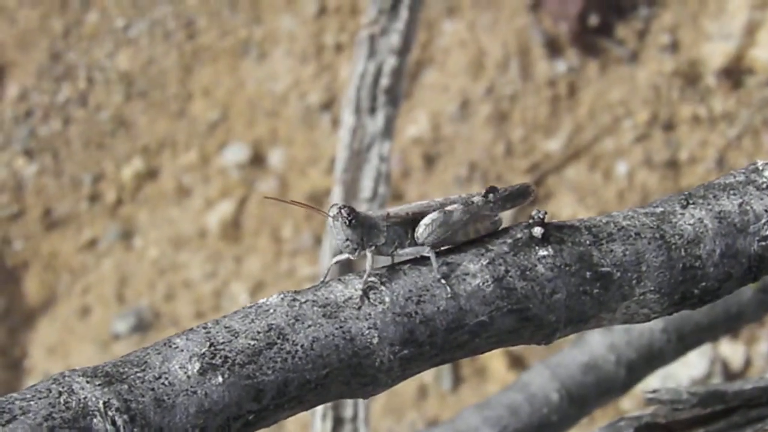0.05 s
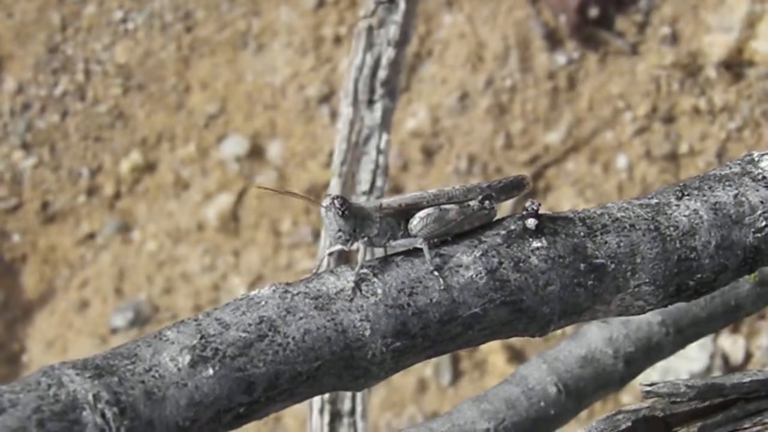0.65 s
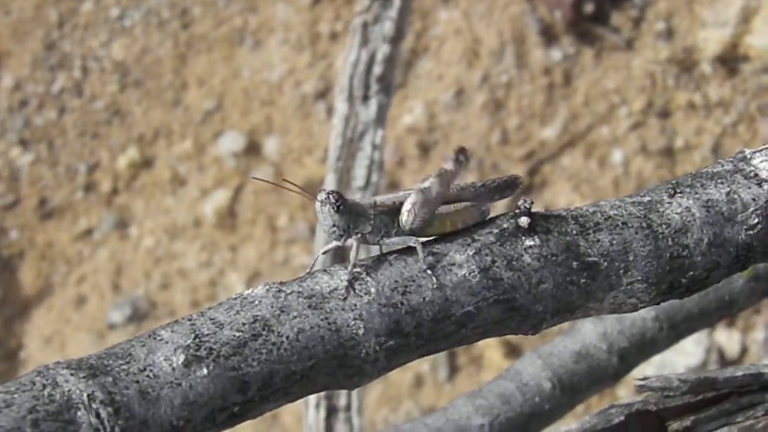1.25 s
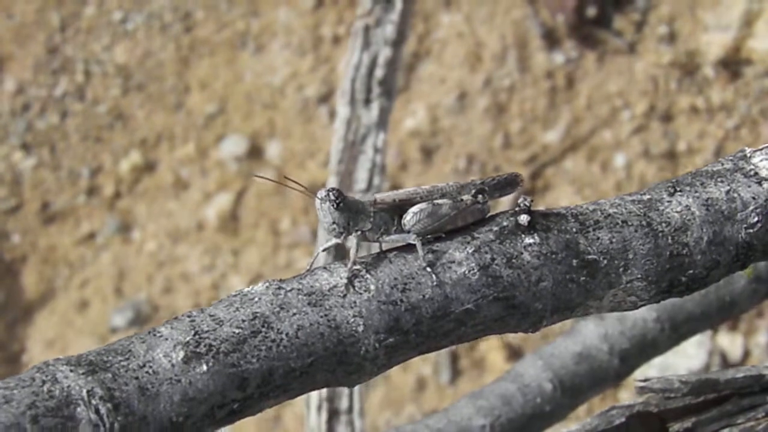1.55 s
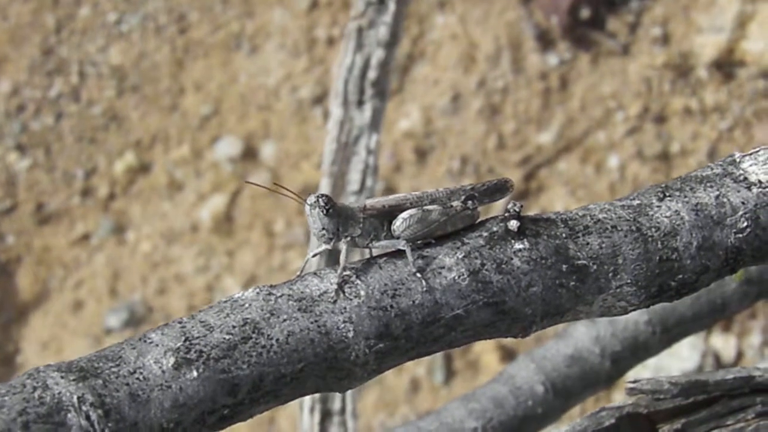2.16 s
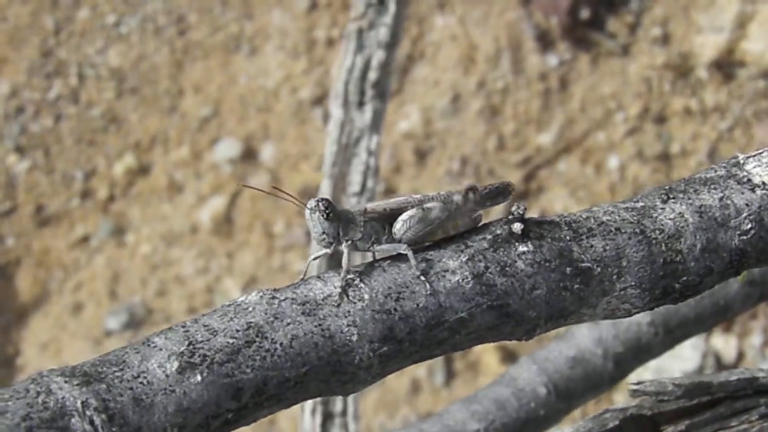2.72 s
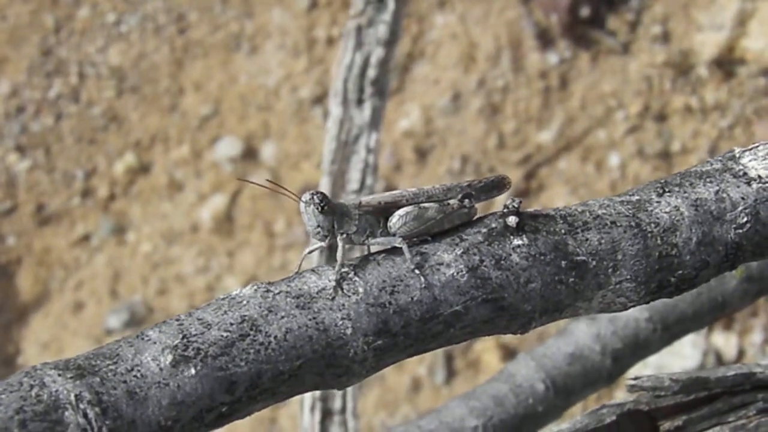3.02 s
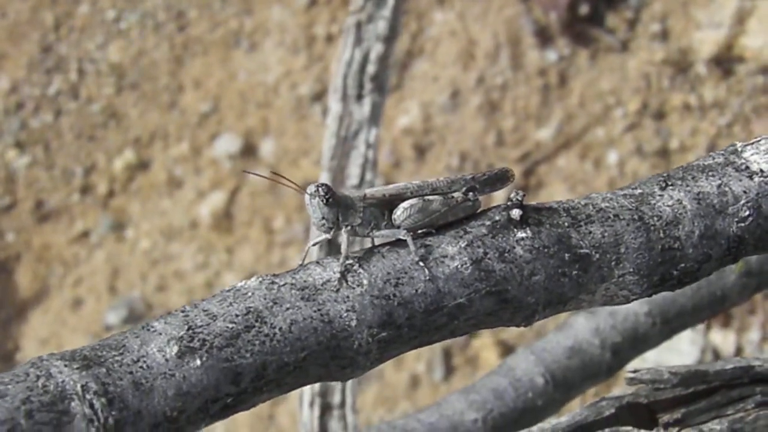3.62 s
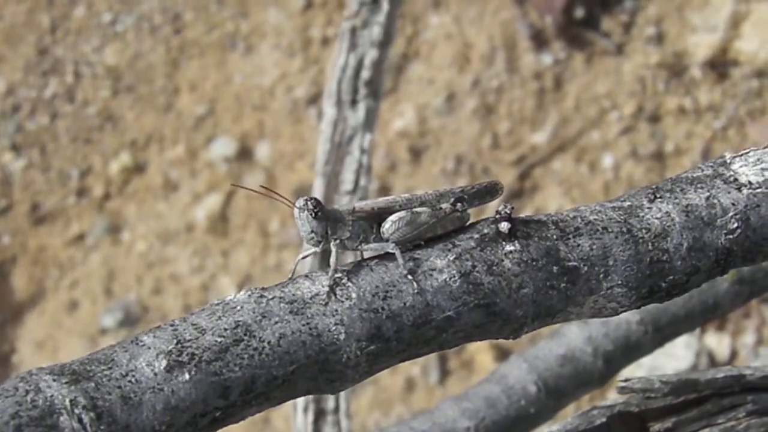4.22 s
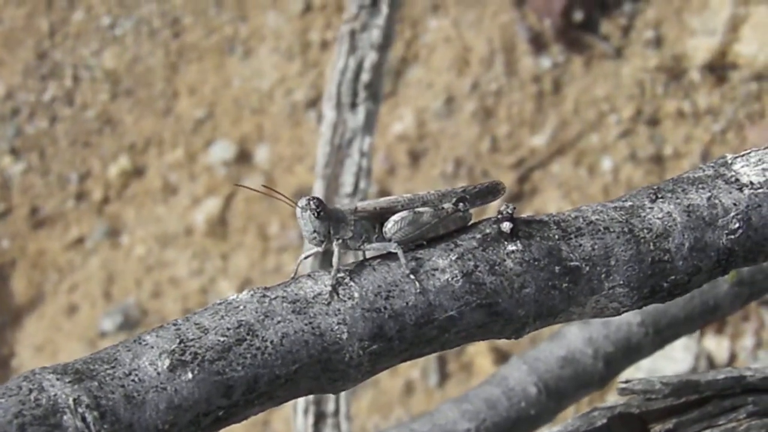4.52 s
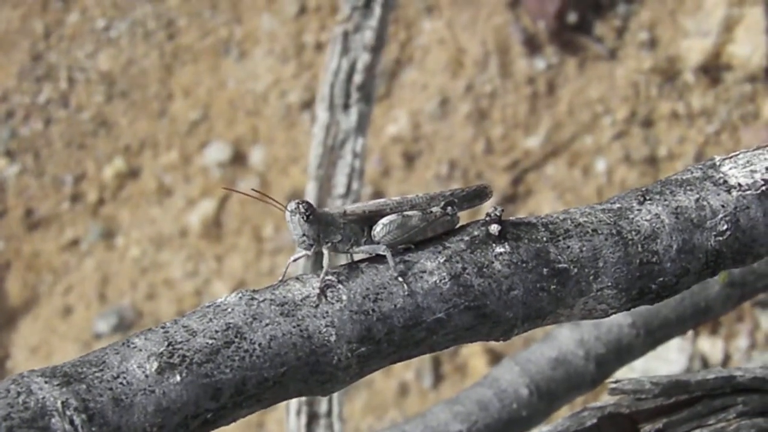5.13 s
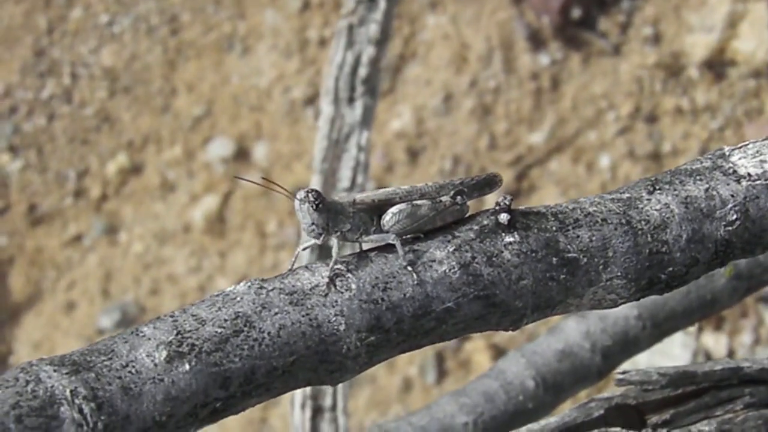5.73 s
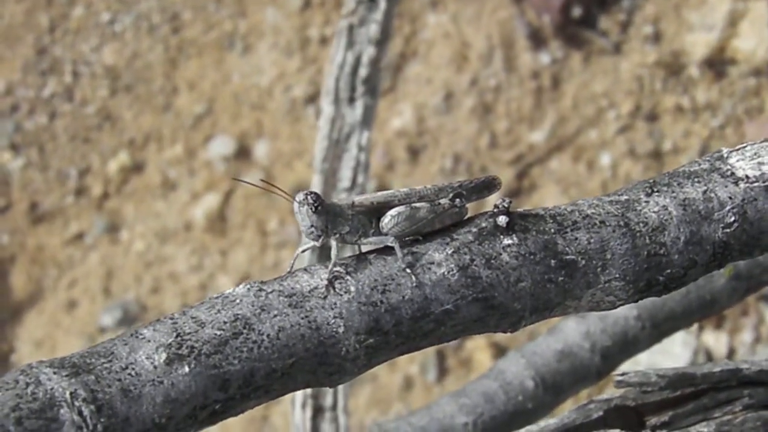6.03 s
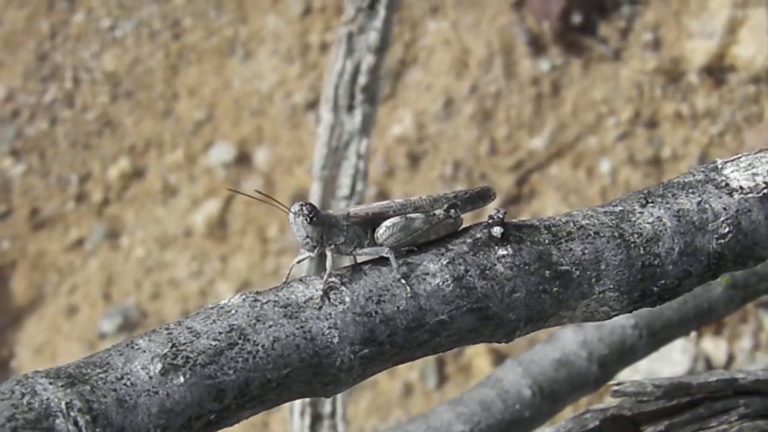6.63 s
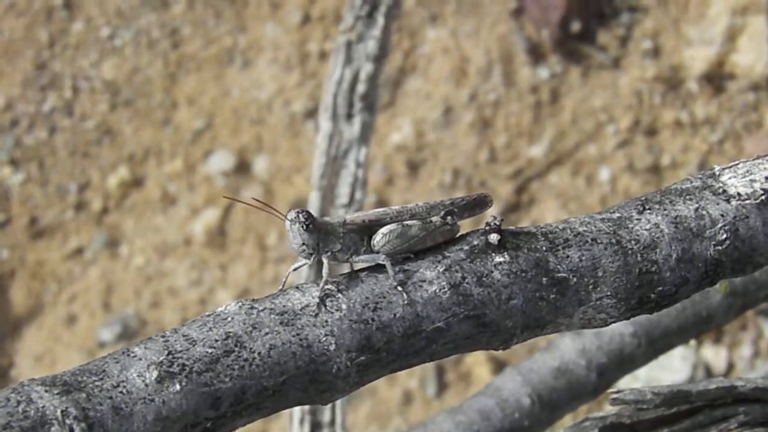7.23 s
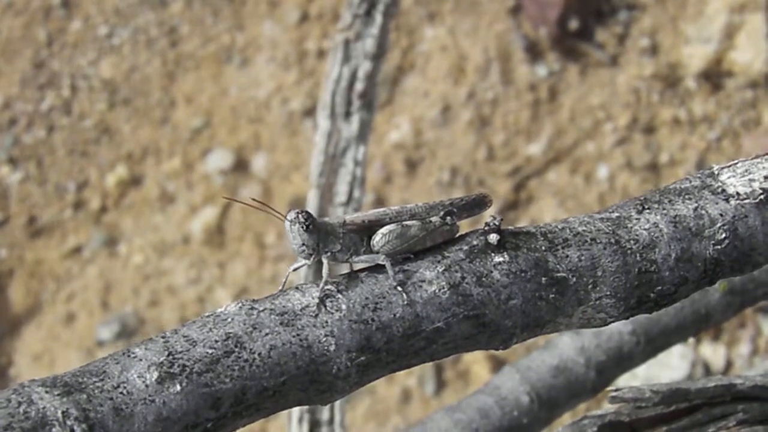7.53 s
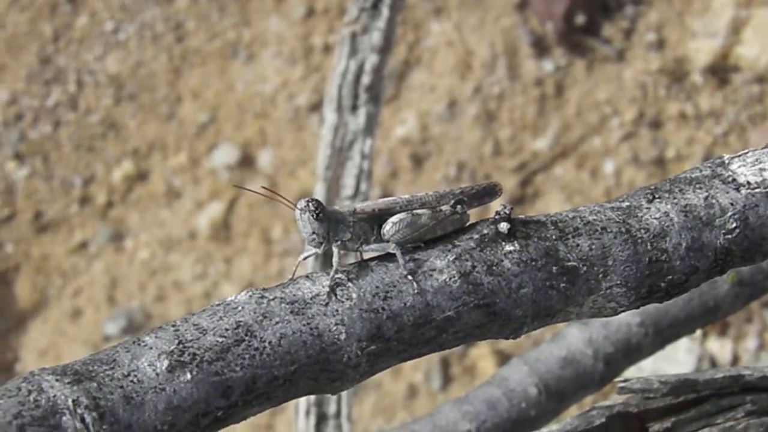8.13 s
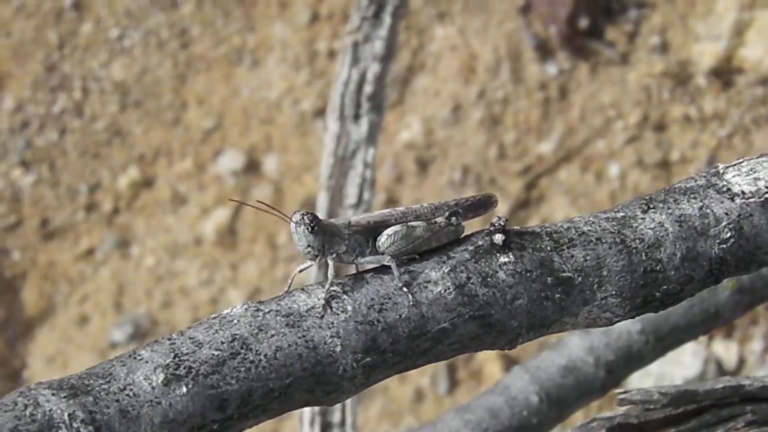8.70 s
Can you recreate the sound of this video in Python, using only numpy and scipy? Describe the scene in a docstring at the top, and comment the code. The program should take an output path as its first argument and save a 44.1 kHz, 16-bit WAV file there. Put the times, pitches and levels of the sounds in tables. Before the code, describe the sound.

A close grasshopper makes sharp, short clicks, singly or in pairs, over faint insect ticks and a steady outdoor rush.

```python
"""A grasshopper on a dead branch, close to the microphone, flicks a hind leg against its wing:
each click is a run of five to seven tiny rasps. Farther out, other insects tick, a small bird chirps
now and then, and something calls harshly once, far off. Behind lie the rush of open country and a faint
engine drone; one puff of wind touches the microphone. The mono recorder turns its gain down after the
loudest clicks."""
import sys
import numpy as np
from scipy import signal
from scipy.fft import rfft, irfft, next_fast_len
from scipy.io import wavfile
from scipy.ndimage import uniform_filter1d

SR = 44100
rng = np.random.default_rng(int(sys.argv[2]) if len(sys.argv) > 2 else 0)


def bounce(signal):
    """Save signal as a 16-bit WAV file at the path given by the first command-line argument."""
    frames = np.transpose(np.atleast_2d(signal))
    limited = np.clip(frames, -1, 1)
    pcm = np.round(limited * 32767).astype(np.int16)
    wavfile.write(sys.argv[1], SR, pcm)


N = 386316
TIME = np.arange(N) / SR

# colour of the outdoor rush: (frequency [Hz], relative level [dB])
AIR_COLOUR = [(20, -35.5), (45, -25), (65, -27), (100, -16.5), (160, -8.5), (260, -1), (420, 0.5),
              (700, -1.16), (1200, -5), (2200, -9.5), (4000, -14), (7500, -17), (11000, -19.5),
              (15500, -22)]
# slow course of its rumble: (time [s], relative level [dB])
RUMBLE_LEVELS = [(0.0, -50), (0.36, -49), (0.83, -48.5), (2.27, -50.5), (3.71, -49.5), (3.9, -50),
                 (4.37, -49.5), (5.78, -50), (8.44, -49), (8.76, -46.5)]
# far engine tones, each swelling once:
# (pitch [Hz], resting level [dB], swell time [s], swell half length [s], swell height [dB])
ENGINE_TONES = [(86.65, -76, 5.002, 0.69, 5.5), (126.2, -77, 2.005, 0.293, 10),
                (149.2, -74.5, 6.52, 0.278, 4)]
# what a wing radiates, close up and from afar: (frequency [Hz], relative level [dB])
NEAR_WING_COLOUR = [(2000, -16), (3000, -8), (3900, -7.5), (5000, -8), (6500, -1), (8800, 1.5), (10500, -1),
                    (13000, -1.5), (15500, -4)]
FAR_WING_COLOUR = [(2000, -29), (4000, -12.5), (6000, -6), (7400, -1), (8800, -1), (10500, -3.5),
                   (13000, -4.5), (15500, -10.5)]
# the grasshopper's leg strokes: (start [s], length [s], level [dB], hardest point [0-1], first peg [dB],
# last peg [dB], blur [0-1], low edge [Hz], strongest resonance [Hz], treble tilt [dB/octave])
LEG_STROKES = [(0.2328, .0164, -14.5, 0.43, 3, -3, 0, 3700, 9130, 0),
               (1.2829, 0.01905, -18, 0.51, -5.5, -8.5, 1, 4560, 7550, -1.5),
               (1.3540, 0.02454, -11.5, 0.69, -7.5, -6.5, 0.94, 3700, 8710, 1),
               (3.8735, .0158, -15, 0.38, 1.5, 0.5, 0.12, 3750, 14200, 1),
               (5.3483, 0.0137, -30, .48, -10.5, -11, .55, 3850, 8600, -4.5),
               (6.0739, .0188, -19.5, 0.69, -6, -3.5, 0.98, 4750, 6360, 0),
               (7.2420, 0.0149, -33, .5, -9.5, -7.5, 0.52, 3640, 7470, -4.5),
               (7.3151, 0.0159, -31.5, .5, -11.5, -4.5, 0.67, 3650, 7960, -3.5)]
# runs of ticks from insects farther out: (start [s], ticks [count], gap [s], relative level [dB],
# strongest resonance [Hz], treble tilt [dB/octave])
FAR_TICK_RUNS = [(.334, 4, .071, -50, 8200, -2.5), (.784, 3, 0.0655, -49.5, 8400, -5),
                 (1.583, 2, 0.079, -50.5, 7500, -3), (1.822, 2, 0.0794, -49.5, 8180, -2),
                 (2.144, 1, 0, -52.5, 6200, -9), (2.565, 2, .071, -50, 8800, -3),
                 (2.924, 3, .073, -54.5, 10000, 0.5), (3.21, 2, 0.084, -49, 8300, -1.5),
                 (3.461, 1, 0, -52.5, 9900, 2.5), (3.674, 2, 0.089, -51, 7400, -7),
                 (4.021, 4, 0.065, -51, 8600, -1), (4.665, 4, 0.078, -52, 8700, -1),
                 (5.268, 1, 0, -46.5, 6870, -1.5), (5.428, 1, 0, -51.5, 8400, -4),
                 (5.901, 2, 0.072, -49, 9030, -1.5), (6.449, 3, 0.0798, -49.5, 7720, -1.5),
                 (6.67, 1, 0, -54.5, 8800, 1), (6.755, 2, 0.065, -50.5, 9500, 6),
                 (7.063, 2, .067, -54.5, 7700, -1), (7.413, 1, 0, -51, 9200, 0.5),
                 (7.668, 2, .063, -52.5, 8600, -1.5), (7.947, 1, 0, -50, 9500, 3),
                 (8.024, 2, .075, -48, 7360, -2), (8.061, 2, 0.0885, -48.5, 8000, -0.5),
                 (8.659, 2, 0.073, -55, 8900, -3)]
# the bird's falling notes: (start [s], length [s], level [dB], first pitch [Hz], last pitch [Hz],
# bend [+ drops early, - drops late])
BIRD_NOTES = [(.774, .025, -51.5, 7300, 5200, -0.5), (0.798, 0.065, -48, 6100, 4780, 3.0),
              (4.676, .013, -55.5, 6600, 5500, -1.0), (4.697, .062, -54, 6000, 5200, 3),
              (6.6, 0.0335, -57, 5500, 5200, 4)]
# a low wing mode left ringing: (time [s], level [dB], half length [s], pitch [Hz], glide [Hz/s])
RINGING_MODES = [(1.3745, -30.5, 0.0039, 4042, -45000), (5.361, -43.5, 0.0024, 3870, -70000),
                 (6.1065, -44.5, 0.0026, 4550, -40000), (7.253, -47, 0.00186, 4050, -30000),
                 (7.33, -42.5, 0.0026, 4500, 70000)]
# colour of wind on the microphone: (frequency [Hz], relative level [dB])
WIND_COLOUR = [(20, -30), (55, -11), (90, -2), (130, -5.5), (250, -26)]
# resonances of the harsh call: (frequency [Hz], width [Hz], relative level [dB])
CALL_RESONANCES = [(1956, 69, 0.5), (2230, 117, -6.5), (2590, 180, -8), (3150, 147, -10.5),
                   (3803, 130, -7.5), (4550, 237, -9), (5474, 91, -4.5), (6490, 120, -11), (7300, 250, -15)]


def from_db(db):
    """Decibels to gain."""
    return 10 ** (np.asarray(db) / 20)


def unit_rms(x):
    """Scale to an rms of 1."""
    return x / np.sqrt(np.mean(x ** 2) + 1e-20)


def bell(x, width):
    """A smooth hump of height 1."""
    return np.exp(-.5 * (x / width) ** 2)


def colour_db(colour, hz):
    """A spectrum in dB, read on a log-frequency axis."""
    freqs, db = np.transpose(colour)
    return np.interp(np.log(hz + 1), np.log(freqs), db)


def noise(colour):
    """Steady noise of a given colour, rms 1."""
    size = next_fast_len(N)
    hz = np.arange(size // 2 + 1) * SR / size
    spectrum = rfft(rng.standard_normal(size)) * from_db(colour_db(colour, hz))
    return unit_rms(irfft(spectrum, size)[:N])


def drift(per_s):
    """Slow random wander with a spread of about 1."""
    knots = rng.standard_normal(2048)
    return np.interp(TIME * per_s, np.arange(len(knots)), knots)


def resonance(x, hz, width_hz):
    """Two-pole resonance with gain 1 at its peak."""
    radius = np.exp(-np.pi * width_hz / SR)
    feedback = [1, -2 * radius * np.cos(2 * np.pi * hz / SR), radius ** 2]
    return signal.lfilter(np.array([1, 0, -1]) * (1 - radius ** 2) / 2, feedback, x)


def centred_time(size=2048):
    """A short time axis in seconds, centred on zero."""
    return (np.arange(size) - size // 2) / SR


def add(out, sound, centre_s):
    """Mix a short sound into out, centred on a moment."""
    at = round(centre_s * SR) - len(sound) // 2 + np.arange(len(sound))
    inside = (at >= 0) & (at < N)
    out[at[inside]] += sound[inside]


def open_air(rumble_trim_db=-2.5, waver_db=0.32, hiss_db=-46.5, split_hz=450):
    """The broad, distant rush: a gently wavering rumble under a steady hiss."""
    lows = signal.butter(2, split_hz, "low", fs=SR, output="sos")
    highs = signal.butter(2, split_hz, "high", fs=SR, output="sos")
    rumble = unit_rms(signal.sosfilt(lows, noise(AIR_COLOUR)))
    hiss = unit_rms(signal.sosfilt(highs, noise(AIR_COLOUR)))
    rumble_db = np.interp(TIME, *np.transpose(RUMBLE_LEVELS)) + rumble_trim_db
    return from_db(rumble_db + waver_db * drift(per_s=3.03)) * rumble + from_db(hiss_db) * hiss


def engine_drone(wander_hz=0.682, fade_db=2.0):
    """Low engine tones fade in and out on their long way to the microphone."""
    out = np.zeros(N)
    for hz, rest_db, swell_s, half_s, swell_db in ENGINE_TONES:
        level_db = rest_db + swell_db * bell(TIME - swell_s, half_s)
        phase = 2 * np.pi * np.cumsum(hz + wander_hz * drift(per_s=2.93)) / SR
        out += np.sqrt(2) * from_db(level_db + fade_db * drift(per_s=4.3)) * np.sin(phase)
    return out


def rasp(pressure, wing, low_hz, peak_hz, tilt_db, peak_db, peak_width_hz):
    """Friction under a pressure pulse shakes a wing: one resonance leads, little sounds below low_hz."""
    size = len(pressure)
    hz = np.arange(size // 2 + 1) * SR / size
    treble_octaves = np.log2(np.maximum(hz, 4500) / 9000)
    wing_db = colour_db(wing, hz) + tilt_db * treble_octaves + peak_db * bell(hz - peak_hz, peak_width_hz)
    low_cut = 1 / np.sqrt(1 + (low_hz / (hz + 1)) ** 11)
    slips = rfft(pressure * rng.choice([-1, 1], size))
    # the slips are so brief that they feed all broad bands alike
    slips /= np.sqrt(uniform_filter1d(np.abs(slips) ** 2, size=90) + 1e-12)
    radiated = irfft(slips * from_db(wing_db) * low_cut)
    return unit_rms(radiated) * np.sqrt(np.mean(pressure ** 2))


def peg_pressure(along, blur, stretch, first_s=0.00058, last_s=0.001895, blur_s=0.000804):
    """One peg grips and leaves a faint tail; along the stroke (0-1) grips lengthen as the leg slows."""
    t = centred_time()
    half_s = stretch * (first_s + (last_s - first_s) * along ** 4.06 + blur_s * blur * np.sin(np.pi * along))
    grip = np.exp(-.5 * np.abs(t / half_s) ** 2.5) / np.sqrt(stretch)   # a briefer grip is sharper
    tail = from_db(-16) * (t > 0) * np.exp(-np.abs(t) / 0.0015)
    return np.maximum(grip, tail)


def grasshopper(peg_gap_s=.0039, scatter_octaves=0.183, stretch_octaves=0.245, thin_octaves=0.4):
    """Close up, a leg drags pegs over the wing: the first snap singly, the last blur into a scrape."""
    out = np.zeros(N)
    for start, length_s, level_db, hardest, first_db, last_db, blur, low_hz, hz, tilt_db in LEG_STROKES:
        for along in np.linspace(0, 1, round(length_s / peg_gap_s) + 1):
            peak_hz = hz * 2 ** (scatter_octaves * rng.uniform(-1.04, 1))
            stretch = 2 ** (stretch_octaves * rng.uniform(-1.04, 1))
            edge_hz = low_hz * 2 ** (thin_octaves * (along == 0))   # the first peg sounds thinner
            press_db = np.interp(along, [0, hardest, 1], [first_db, 0, last_db])
            strike = rasp(peg_pressure(along, blur, stretch), NEAR_WING_COLOUR, edge_hz, peak_hz,
                          tilt_db, peak_db=6.0, peak_width_hz=556)
            add(out, from_db(level_db + press_db) * strike, start + along * length_s)
    return out


def far_tick(hz, tilt_db, peg_gap_s=0.004035, half_s=0.00717, depth=0.86):
    """A leg stroke from afar: the pegs ripple under one short swell."""
    t = centred_time()
    pegs = 1 + depth * np.cos(2 * np.pi * (t / peg_gap_s + rng.random()))
    return rasp(bell(t, half_s) * pegs, FAR_WING_COLOUR, low_hz=4200, peak_hz=hz,
                tilt_db=tilt_db, peak_db=5.0, peak_width_hz=720)


def other_insects(lift_db=1.5, uneven_db=0.68, faint_db=-58, faint_count=55):
    """Farther out, short runs of about fourteen ticks a second, and a scatter of barely audible ones."""
    out = np.zeros(N)
    for start, ticks, gap_s, level_db, hz, tilt_db in FAR_TICK_RUNS:
        for k in range(ticks):
            tick_db = level_db + lift_db + uneven_db * rng.uniform(-0.89, 1)
            add(out, from_db(tick_db) * far_tick(hz, tilt_db), start + k * gap_s)
    for when, strength, pitch in rng.random((faint_count, 3)):
        tick = far_tick(7000 + 2500 * pitch, tilt_db=-2.5)
        add(out, from_db(faint_db + 3.9 * strength) * tick, when * TIME[-1])
    return out


def small_bird():
    """Thin whistled notes that swell and fade as their pitch falls."""
    out = np.zeros(N)
    for start, length_s, level_db, first_hz, last_hz, bend in BIRD_NOTES:
        along = np.clip((TIME - start) / length_s, 0, 1)
        hz = first_hz + (last_hz - first_hz) * np.expm1(-bend * along) / np.expm1(-bend)
        swell = 2 * np.sqrt(along * (1 - along))
        out += from_db(level_db) * swell * np.sin(2 * np.pi * np.cumsum(hz) / SR)
    return out


def wing_rings(rough_rad=0.65):
    """Some strokes leave the near wing ringing: a brief, scratchy tone that slides as the wing relaxes."""
    out, t = np.zeros(N), centred_time()
    for centre_s, level_db, half_s, hz, glide in RINGING_MODES:
        jitter = rough_rad * unit_rms(uniform_filter1d(rng.standard_normal(len(t)), size=40))
        tone = np.sin(2 * np.pi * (hz * t + .5 * glide * t ** 2) + jitter)
        add(out, np.sqrt(2) * from_db(level_db) * bell(t, half_s) * tone, centre_s)
    return out


def wind_puff(centre_s=4.03, half_s=.08, level_db=-61.5):
    """One soft, low puff of wind on the microphone."""
    return from_db(level_db) * bell(TIME - centre_s, half_s) * noise(WIND_COLOUR)


def harsh_call(peak_s=4.855, level_db=-44.5, hold_s=0.0388, rise_db_per_s=1600, decay_db_per_s=123.5):
    """Far off, a noisy squawk through fixed resonances, dying away with distance."""
    breath = rng.standard_normal(N)
    voice = sum((-1) ** k * from_db(db) * resonance(breath, hz, width_hz)
                for k, (hz, width_hz, db) in enumerate(CALL_RESONANCES))
    t = TIME - peak_s
    fade_db = rise_db_per_s * np.maximum(-t, 0) + decay_db_per_s * np.maximum(t - hold_s, 0)
    return from_db(level_db - np.minimum(fade_db, 100)) * unit_rms(voice)


def ground_scatter(x, wet_db=-13.0, t60_s=0.0476):
    """Stones and branches throw back a brief, faint smear."""
    t = np.arange(SR // 10) / SR
    echoes = rng.standard_normal(len(t)) * from_db(-60 * t / t60_s)
    echoes /= np.sqrt(np.sum(echoes ** 2))
    return x + from_db(wet_db) * signal.fftconvolve(x, echoes)[:N]


def scene():
    """All sources at one microphone by the branch, the same on both channels."""
    insects = ground_scatter(grasshopper() + wing_rings() + other_insects())
    mono = insects + small_bird() + harsh_call() + open_air() + wind_puff() + engine_drone()
    return np.array([mono, mono])


def gain_control(x, threshold_db=-22.5, steepness=6.8, depth_db=8.5,
                 window_s=0.0206, react_s=0.0018, release_db_per_s=290):
    """When the last few hundredths of a second were too loud, the recorder's gain drops, then recovers."""
    size = int(window_s * SR)
    power = signal.fftconvolve(x[0] ** 2, np.ones(size) / size)[:N]
    excess_db = 10 * np.log10(np.abs(power) + 1e-12) - threshold_db
    cut_db = np.clip(steepness * excess_db, 0, depth_db)
    delayed_db = np.interp(TIME - react_s, TIME, cut_db)
    release_db = release_db_per_s * TIME
    held_db = np.maximum.accumulate(delayed_db + release_db) - release_db
    smooth_db = signal.lfilter([.005], [1, -.995], held_db)   # eased over about 4.5 ms
    return x * from_db(-smooth_db)


def record(dry, ceiling=0.77, notch_hz=7875, cutoff_hz=15820):
    """The recorder: gain control, rounded peaks, a narrow notch in the treble and a steep top cut."""
    rounded = ceiling * np.tanh(gain_control(dry) / ceiling)
    notched = signal.lfilter(*signal.iirnotch(notch_hz, Q=45, fs=SR), rounded)
    return signal.sosfilt(signal.ellip(10, .2, 70, cutoff_hz, fs=SR, output="sos"), notched)


dry = scene()
out = record(dry)
bounce(out)
```